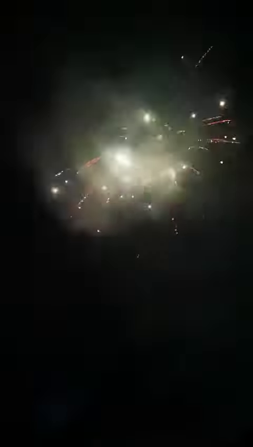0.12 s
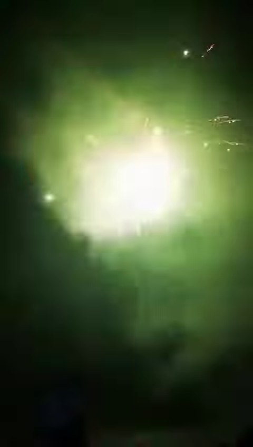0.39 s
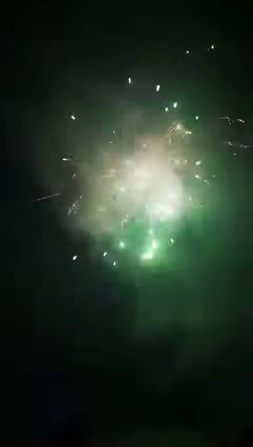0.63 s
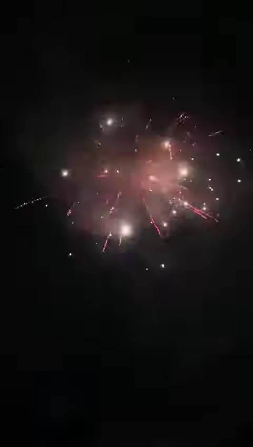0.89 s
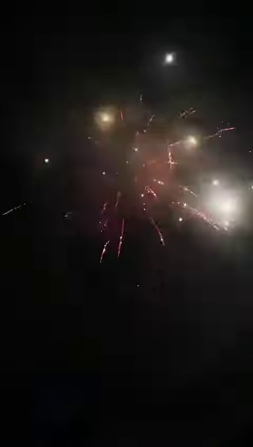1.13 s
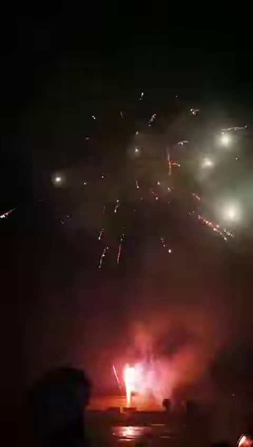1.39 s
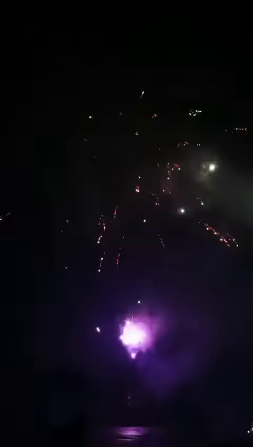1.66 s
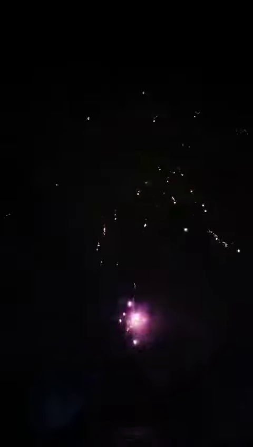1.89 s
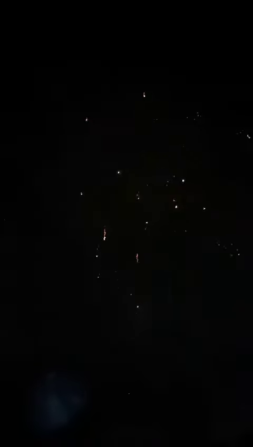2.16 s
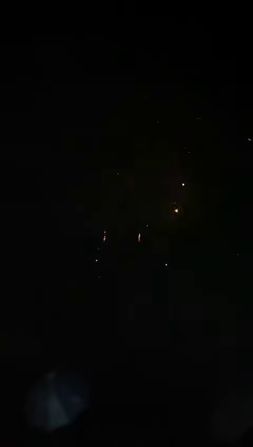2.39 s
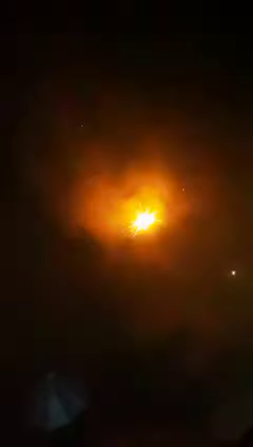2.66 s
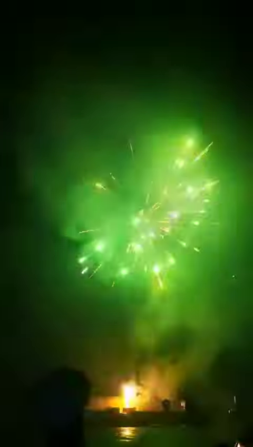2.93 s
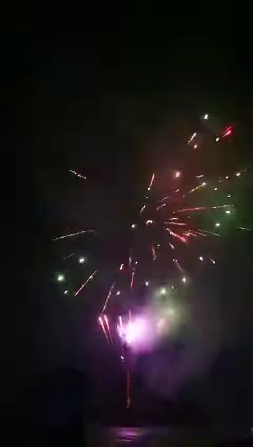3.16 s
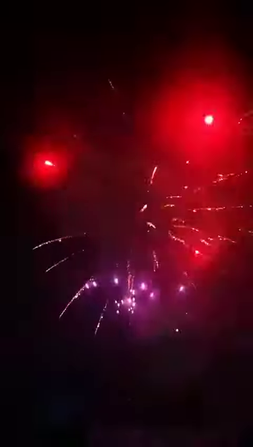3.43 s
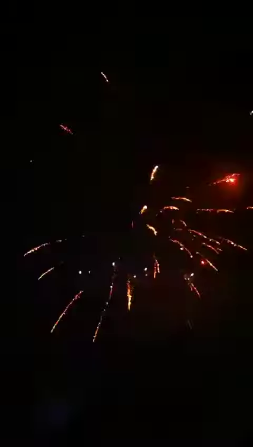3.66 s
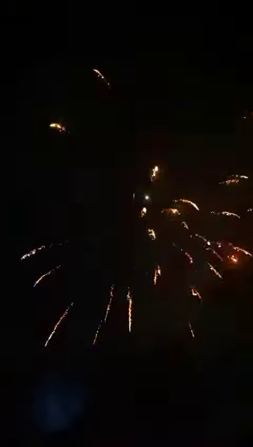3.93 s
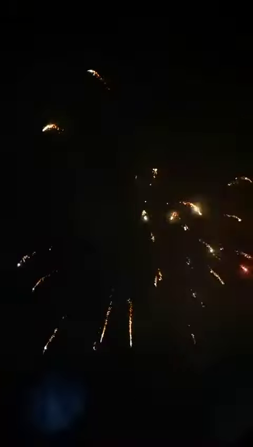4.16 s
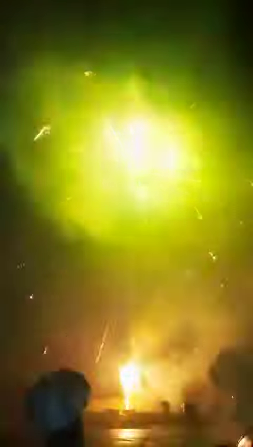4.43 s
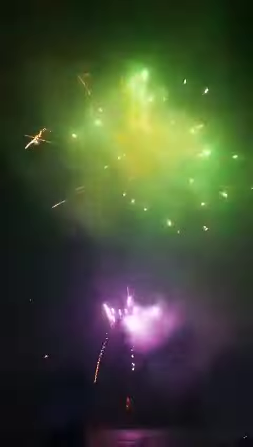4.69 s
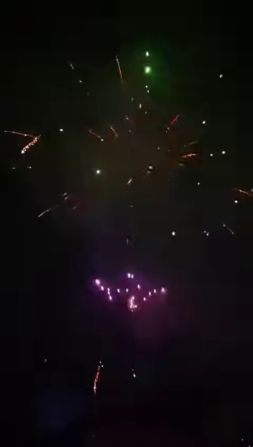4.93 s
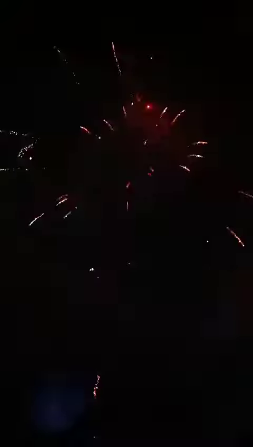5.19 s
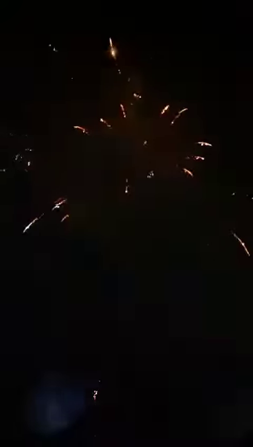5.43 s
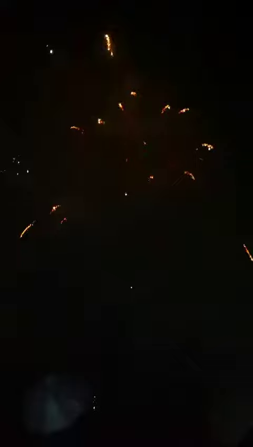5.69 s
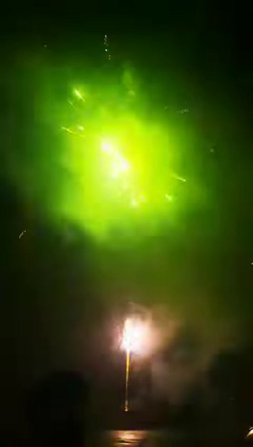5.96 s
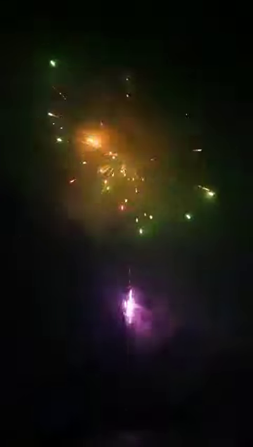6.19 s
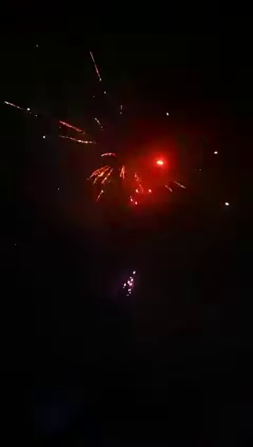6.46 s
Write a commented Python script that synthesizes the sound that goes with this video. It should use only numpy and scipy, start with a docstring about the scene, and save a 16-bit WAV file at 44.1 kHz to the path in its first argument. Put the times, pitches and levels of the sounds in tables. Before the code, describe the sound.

The fading roll of an earlier blast is cut by a hard overhead bang, then a muffled launch thump and a gap of over a second. Three more loud bursts follow, the last two with thumps almost on top of them. Echoes tumble off distant walls, losing treble. Open night air, mono small microphone with slight wind buffeting and faint brief hissy puffs after some blasts.

```python
"""Multi-shot firework at night

Outdoors: lift charges thump in their tubes, and shells burst overhead; the blasts are damped swings.
Each bang arrives as a blast, a ground echo and a few near echoes, then rolls away among distant walls,
losing its treble: banded noise under swelling and fading levels, with ragged cracks and faint night air.
Light wind rumbles on the small microphone as low noise; faint bright puffs of treble noise follow some bangs."""
import sys
import numpy as np
from scipy import signal
from scipy.fft import rfft, irfft, next_fast_len
from scipy.io import wavfile
from scipy.ndimage import uniform_filter1d

SR = 44100
rng = np.random.default_rng(int(sys.argv[2]) if len(sys.argv) > 2 else 0)


def level_to_linear(level):
    """Convert decibel levels to linear amplitude factors, elementwise."""
    exponent = np.asarray(level, float) / 20
    return 10 ** exponent


def dump_mix(stems):
    """Bounce the given channels to the path in sys.argv[1] as a 16-bit WAV at rate SR."""
    frames = np.atleast_2d(stems).T  # one column per channel
    limited = np.clip(frames, -1, 1)  # hard clip at full scale
    pcm = np.round(limited * 32767).astype(np.int16)
    wavfile.write(sys.argv[1], SR, pcm)


N = 290178

# Shells bursting overhead. Each row: time in seconds, blast level in dB, crackle level in dB, roll level in dB.
BURSTS = [(0.3699, 0.5, -7.5, -25.5), (2.801, 2, -6, -23.5), (4.4251, 1.5, -6, -24),
          (5.924, 2.5, -7, -24.5)]
EARLIER_BURST_S, EARLIER_ROLL_DB = -0.5, -25.5   # only its roll is still heard
# Lift charges in their tubes. Each row: time in seconds, blast level in dB, crackle level in dB, roll level in dB.
LIFTS = [(1.4269, -14.5, -33.5, -26.5), (3.0506, -7.5, -28, -20.5), (4.5031, -9.5, -28.5, -22.5),
         (5.8837, -11, -23.5, -23.5)]

# Paths from a shell to the microphone. Each row: delay in ms, sign, level in dB, ring in Hz, t60 in seconds.
BURST_PATHS = [(0, -1, 2.5, 310, .021), (3.7, 1, -1.5, 620, .016), (5.9, 1, 3.0, 285, .027),
               (2.5, 1, -14, 45, .06), (.9, 1, -7, 1100, .02), (-.3, 1, -8, 3500, .015),
               (16.2, -1, -9, 300, .02), (93, 1, -16, 310, .03), (1006, -1, -42, 265, .09)]
# Paths from a tube to the microphone. Each row: delay in ms, sign, level in dB, ring in Hz, t60 in seconds.
LIFT_PATHS = [(-.1, 1, -2.5, 290, .07), (8.0, 1, 3.9, 433, .012), (9.9, -1, -4.3, 208, .083),
              (14.8, 1, -5.5, 107, .2), (26.3, -1, -12, 304, .06), (33.3, 1, -5, 358, .03),
              (39.8, -1, -8, 280, .015), (49.5, -1, -1, 175, .011), (9.0, -1, -7, 940, .04),
              (4, -1, -17, 42, .12), (425, -1, -27, 205, .16)]

# Sharp edges of a burst. Each row: delay in ms, level at its onset in dB, length in ms.
BURST_CRACKS = [(-.4, 0.5, .6), (.2, -2.5, 5.2)]
# Sharp edges of a lift charge. Each row: delay in ms, level at its onset in dB, length in ms.
LIFT_CRACKS = [(0, -15, 1.1), (7.8, -16, 2.1), (18, -1, 3.5)]
CRACK_RISE_DB_PER_MS, LIFT_CRACK_TOP_HZ = 0.6, 9200

# Spectrum shape of the cracks. Each row: frequency in Hz, relative level in dB per Hz.
CRACK_COLOUR = [(1140, -5), (2890, -15.5), (3490, -16), (5310, -21), (8000, -20.5), (11000, -22),
                (15000, -14.5)]
# Spectrum shape of a burst's roll. Each row: frequency in Hz, relative level in dB per Hz.
BURST_COLOUR = [(25, -22.5), (60, -8), (129, -7.5), (305, -1.5), (482, -3.5), (700, -10), (970, -17.5),
                (1240, -14), (2630, -26), (4380, -26), (7300, -32.5), (11000, -32.5), (15000, -40)]
# Spectrum shape of a lift charge's roll. Each row: frequency in Hz, relative level in dB per Hz.
LIFT_COLOUR = [(25, -24.5), (119, 3), (169, -19.5), (204, -9), (253, -16), (552, -23), (703, -19),
               (945, -31), (1100, -23), (2500, -36), (4600, -32.5), (7000, -42), (15000, -61)]

# Walls at growing distances, in groups that each swell up and fade.
# Each row: delay in seconds, level in dB, rise in dB per second, fade in dB per second, tilt in dB per octave.
BURST_WALLS = [(.012, 12.5, 699.5, 401.5, -1.54), (.03, 6, 400.5, 260, -0.6), (.1, -2, 152.5, 109, -0.5),
               (.13, -1, 70.5, 48.5, 0.33), (.3, -14.5, 62, 33.5, 1.03), (.56, -18.5, 46, 25.5, -0.5),
               (.83, -18.5, 23.5, 34, 0.1), (1.01, -22.5, 49.5, 58, -1.5), (1.3, -26.5, 24, 21.5, -1.7)]
# The same for the lift charges.
# Each row: delay in seconds, level in dB, rise in dB per second, fade in dB per second, tilt in dB per octave.
LIFT_WALLS = [(.012, -2, 250, 250, 1.1), (.045, -8, 156, 130, -1.4), (.12, -10, 90, 77, 0.52),
              (.24, -24, 60, 63, 2.3), (.44, -27.5, 45, 62, -2.46), (.63, -35.5, 60, 55, -1.6),
              (.9, -40.5, 22, 12, -.2)]
TILT_PIVOT_HZ = 800

# Extra loss of a burst's roll along the way: air eats the treble, small walls return little bass.
# Each row: frequency in Hz, initial loss in dB per second.
BURST_LOSS = [(30, 33.5), (80, 14.5), (150, 9), (300, 3), (1000, 0.5), (2500, 2), (5000, 14), (8000, 34),
              (13000, 54)]
# Extra loss of a lift charge's roll; negative values slow the fade.
# Each row: frequency in Hz, initial loss in dB per second.
LIFT_LOSS = [(30, -8.5), (100, 20.5), (300, -11.5), (1000, 10), (2500, 1.5), (5000, 39), (13000, 15)]
LOSS_EASES_S = 18

# Spectrum shape of the night air. Each row: frequency in Hz, relative level in dB per Hz.
NIGHT_COLOUR = [(25, 1.5), (148, -7), (233, -0.5), (340, -3), (722, -18), (895, -5.5), (1660, -19.5),
                (6210, -31), (15000, -39)]
NIGHT_DB = -71
# Faint bright puffs of treble. Each row: start in seconds, level before the crest allowance in dB, t60 in ms.
TREBLE_PUFFS = [(3.4694, -52, 390), (3.8055, -46, 250), (4.0494, -66, 120), (4.2857, -53.5, 150),
                (4.9294, -55, 120), (5.7794, -61, 120), (6.4394, -56, 120)]
BREEZE_DB = -80.5
# Gusts on the microphone. Each row: time of the peak in seconds, level in dB, rise and fade in dB per second.
GUSTS = [(0.01, -58, 27.5), (1.55, -56, 41), (2.35, -74.5, 65.5), (2.7, -62, 108.5), (3.609, -63.5, 61.5),
         (6.45, -54, 50)]

# The small microphone: a port resonance, then a step down and the end of its range.
# Each row: frequency in Hz, gain in dB.
MICROPHONE = [(20, -2), (7600, -0.5), (8900, 7.5), (9450, 1), (9850, -8.5), (13800, -12), (14800, -27),
              (15300, -38.5), (16400, -57.5), (22050, -79)]
LIMIT_DB, LOOK_AHEAD_MS, RELEASE_DB_PER_S = -7, 3.3, 124
EDGES_HZ = 24 * 2 ** np.arange(0, 9.5, 1 / 3)   # third-octave band edges


def blasts(shots, paths, soft_hz):
    """Each path delivers the pressure step as a short damped swing, a little different per shot."""
    out = np.zeros(N)
    luck_db = rng.normal(0, 1, (len(shots), len(paths)))
    for k, (delay_ms, sign, path_db, hz, t60) in enumerate(paths):
        clicks = np.full(N + 2 * SR, 1e-18)   # late echoes may fall after the end
        for (start, blast_db, *_), wobble_db in zip(shots, luck_db[:, k]):
            clicks[round((start + delay_ms / 1000) * SR)] = sign * level_to_linear(blast_db + path_db + wobble_db)
        decay = level_to_linear(-60 / (t60 * SR))
        turn = 2 * np.pi * hz / SR
        ring = [1, -2 * decay * np.cos(turn), decay * decay]
        out += signal.lfilter([0, np.sin(turn)], ring, clicks[:N])
    return signal.sosfilt(signal.butter(1, soft_hz, fs=SR, output="sos"), out)


def crack_power(shots, cracks):
    """Ragged shock fronts: power of a few milliseconds of loud noise that grows, then stops short."""
    t, power = np.arange(N) / SR, np.zeros(N)
    for start, _, crackle_db, _ in shots:
        for delay_ms, crack_db, length_ms in cracks:
            age_ms = (t - start) * 1000 - delay_ms
            growth_db = CRACK_RISE_DB_PER_MS * np.clip(age_ms, 0, length_ms)
            sounding = (age_ms >= 0) & (age_ms < length_ms)
            power += level_to_linear(crackle_db + crack_db + growth_db) ** 2 * sounding
    return power


def rolls(starts, walls):
    """Per bang: time spent losing colour, and each wall group's power before losses and tilt; then the tilts."""
    t = np.arange(0, N + 32, 32) / SR   # every 32nd sample
    bangs = []
    for start, roll_db in starts:
        age = np.maximum(t - start, 0)
        fading_s = age / (1 + age / LOSS_EASES_S)   # late echoes come from few large walls: the loss eases
        levels_db = []
        for delay, wall_db, rise, fade, _ in walls:
            below_db = np.maximum(rise * (delay - age), fade * (age - delay))
            levels_db.append(roll_db + wall_db - below_db)
        bangs.append((fading_s, level_to_linear(2 * np.array(levels_db)) * (t >= start)))
    tilts = np.transpose(walls)[4]
    return bangs, tilts


def roll_power(bangs, tilts, loss, hz):
    """Summed wall-group power in the band at hz, after tilt and the loss along the way."""
    lean = level_to_linear(2 * tilts * np.log2(hz / TILT_PIVOT_HZ))
    loss_db_per_s = at_hz(loss, hz)
    return sum(lean @ groups * level_to_linear(-2 * loss_db_per_s * fading_s) for fading_s, groups in bangs)


def echoes_and_air(lumpy_db, patchy_db):
    """Countless echoes merge into noise: powers of rolls, cracks and night air add in each band."""
    burst_starts = [(EARLIER_BURST_S, EARLIER_ROLL_DB)] + [(b[0], b[3]) for b in BURSTS]
    bursts = rolls(burst_starts, BURST_WALLS)
    lifts = rolls([(b[0], b[3]) for b in LIFTS], LIFT_WALLS)
    burst_cracks, lift_cracks = crack_power(BURSTS, BURST_CRACKS), crack_power(LIFTS, LIFT_CRACKS)
    lumps = drift(25)   # shared by all bands
    coarse, out = np.arange(N) / 32, np.zeros(N)
    gains = zip(unit(BURST_COLOUR), unit(LIFT_COLOUR), unit(CRACK_COLOUR), unit(NIGHT_COLOUR))
    for (hz, band), (burst, lift, crack, night) in zip(noise_bands(), gains):
        burst_roll = burst ** 2 * roll_power(*bursts, BURST_LOSS, hz)
        lift_roll = lift ** 2 * roll_power(*lifts, LIFT_LOSS, hz)
        roll = burst_roll + lift_roll
        swell_db = lumpy_db * lumps + patchy_db * drift(10) / (1 + hz / 1500)
        roll = np.interp(coarse, np.arange(len(roll)), roll) * level_to_linear(2 * swell_db)
        muffled = lift_cracks / (1 + (hz / LIFT_CRACK_TOP_HZ) ** 4)   # the tube muffles its own crack
        cracks = crack ** 2 * (burst_cracks + muffled) * (hz > 1000)
        air = (night * level_to_linear(NIGHT_DB)) ** 2
        out += band * np.sqrt(roll + cracks + air)
    return out


def treble_puffs(crest_db):
    """Faint bright puffs: treble noise that starts at once and fades, its level set down by crest_db."""
    t = np.arange(N) / SR
    shape = np.zeros(N)
    for start, puff_db, t60_ms in TREBLE_PUFFS:
        decay_db = 60000 * np.maximum(t - start, 0) / t60_ms
        shape += level_to_linear(puff_db - crest_db - decay_db) * (t >= start)
    treble = signal.butter(2, [5000, 13000], "band", fs=SR, output="sos")
    return shape * rms_one(signal.sosfilt(treble, rng.standard_normal(N)))


def wind():
    """Lumpy low noise on the microphone port: a steady breeze and a few gusts."""
    t = np.arange(N) / SR
    gusts = sum(level_to_linear(db - slope * np.abs(t - peak)) for peak, db, slope in GUSTS)
    low = signal.butter(2, [22, 90], "band", fs=SR, output="sos")
    rumble = signal.sosfilt(low, rng.standard_normal(N))
    lumpy = rumble * level_to_linear(drift(9))   # swells of 1 dB spread
    return rms_one(lumpy) * (level_to_linear(BREEZE_DB) + gusts)


def noise_bands():
    """Third-octave bands of noise, flat per Hz, with their centres in Hz; neighbours are unrelated."""
    white = rng.standard_normal((2, N + SR // 2))   # half a second of run-in
    for k, (low, high) in enumerate(zip(EDGES_HZ, EDGES_HZ[1:])):
        band_pass = signal.butter(2, [low, high], "band", fs=SR, output="sos")
        yield np.sqrt(low * high), signal.sosfilt(band_pass, white[k % 2])[-N:]


def drift(rate_hz):
    """Slow chance of spread 1: noise through two equal low-pass poles at rate_hz."""
    pole = np.exp(-64 * np.pi * rate_hz / SR)   # runs at every 32nd sample
    chance = rng.standard_normal(N // 32 + 2002)
    slow = signal.lfilter([1], [1, -2 * pole, pole * pole], chance)[2000:]
    return np.interp(np.arange(N) / 32, np.arange(len(slow)), rms_one(slow))


def unit(spectrum):
    """Gain per band that gives the whole spectrum unit power from white noise of spread 1."""
    centres_hz = np.sqrt(EDGES_HZ[1:] * EDGES_HZ[:-1])
    gain = level_to_linear(at_hz(spectrum, centres_hz))
    return gain / np.sqrt(np.sum(gain ** 2 * np.diff(EDGES_HZ)) * 2 / SR)


def at_hz(points, hz):
    """Reads a spectrum on a log-frequency axis."""
    points_hz, values = np.transpose(points)
    return np.interp(np.log(hz), np.log(points_hz), values)


def rms_one(x):
    """Scales to unit power."""
    return x / np.sqrt(np.mean(x ** 2) + 1e-20)


def scene():
    """Blasts, their rolls, night air, wind and treble puffs, in one channel."""
    bangs = blasts(BURSTS, BURST_PATHS, soft_hz=1500) + blasts(LIFTS, LIFT_PATHS, soft_hz=1250)
    echoes = echoes_and_air(lumpy_db=0.9, patchy_db=2.5)
    return (bangs + echoes + wind() + treble_puffs(crest_db=18.5))[None]


def microphone(x):
    """Colours the sound in minimum phase: the port rings after a hit, never before."""
    size = next_fast_len(N + SR // 10)
    hz = np.arange(1, size // 2 + 2) * SR / size
    log_gain = np.log(level_to_linear(at_hz(MICROPHONE, hz)))
    causal = np.r_[1, np.full(size // 2, 2), np.zeros(size - size // 2 - 1)]
    cepstrum = irfft(log_gain, size) * causal
    colour = np.exp(rfft(cepstrum))
    return irfft(rfft(x, size) * colour, size)[:N]


def limiter(x):
    """Turns the gain down just before a peak passes and lets it return at a steady rate."""
    over_db = np.maximum(20 * np.log10(np.abs(x) + 1e-9) - LIMIT_DB, 0)
    ahead = round(LOOK_AHEAD_MS * SR / 1000)
    ramp = RELEASE_DB_PER_S * np.arange(N) / SR
    held = np.maximum.accumulate(over_db + ramp) - ramp
    early = np.maximum(held, np.r_[held[ahead:], np.zeros(ahead)])
    return x * level_to_linear(-uniform_filter1d(early, size=SR // 500))


def top_cut(x):
    """Nothing passes above the cut-off."""
    return signal.sosfilt(signal.butter(12, 16370, fs=SR, output="sos"), x)


def record(dry):
    """The microphone colours the sound, then a limiter holds the peaks."""
    heard = microphone(dry[0])
    mix = limiter(heard)[None]
    return top_cut(mix)


dry = scene()
out = record(dry)
dump_mix(out)
```